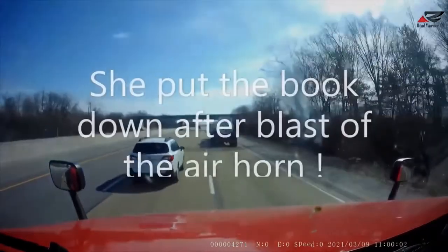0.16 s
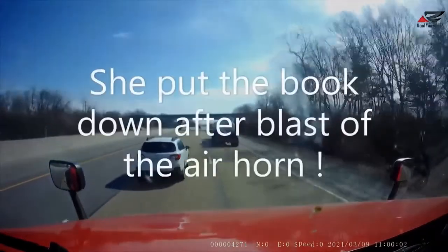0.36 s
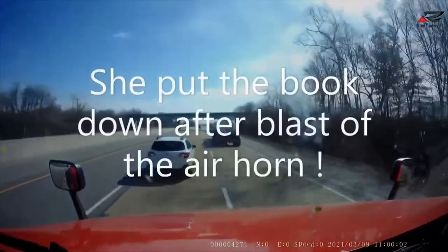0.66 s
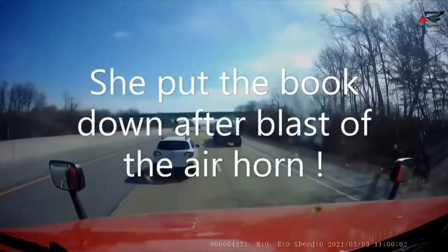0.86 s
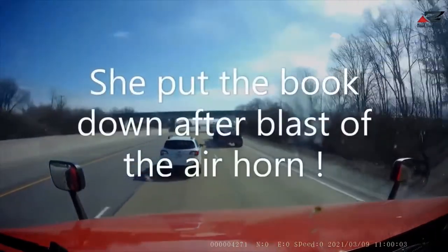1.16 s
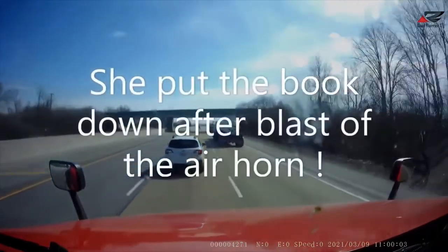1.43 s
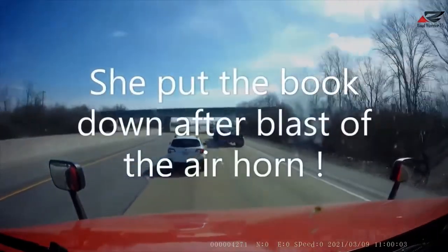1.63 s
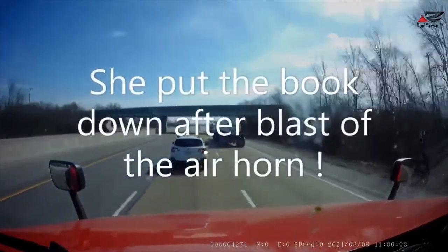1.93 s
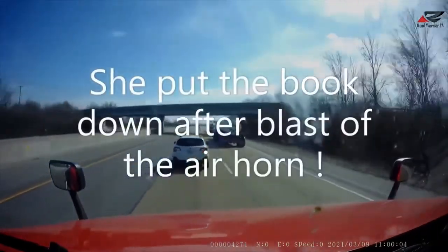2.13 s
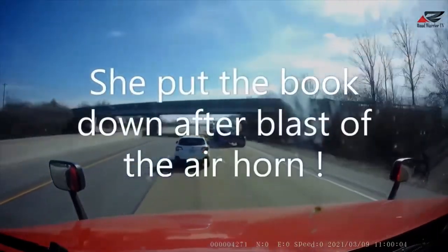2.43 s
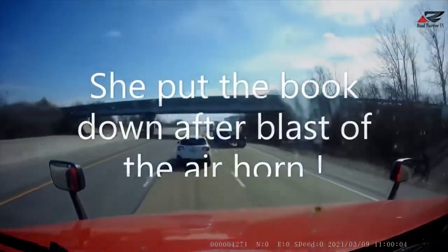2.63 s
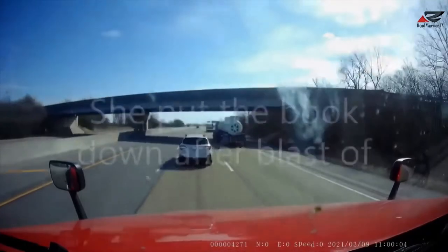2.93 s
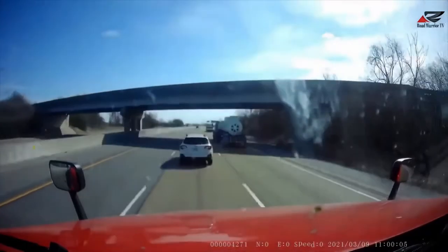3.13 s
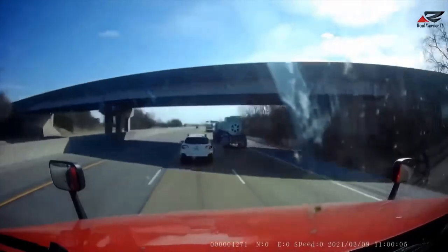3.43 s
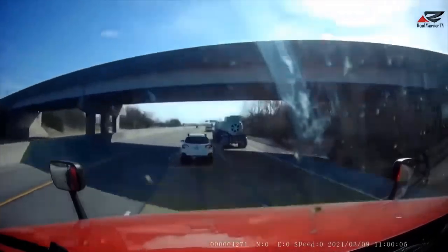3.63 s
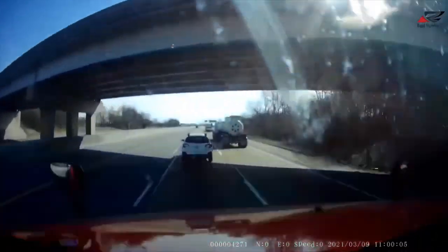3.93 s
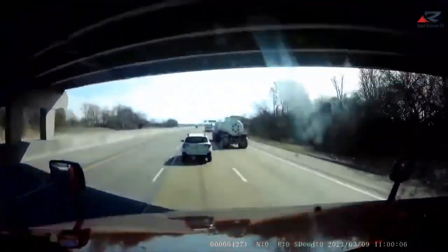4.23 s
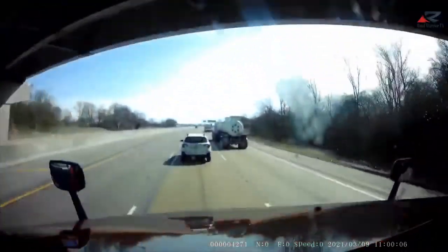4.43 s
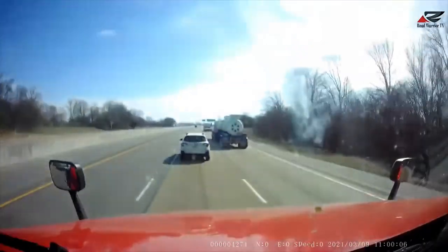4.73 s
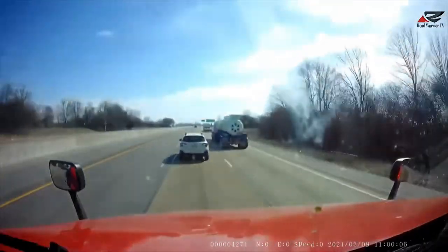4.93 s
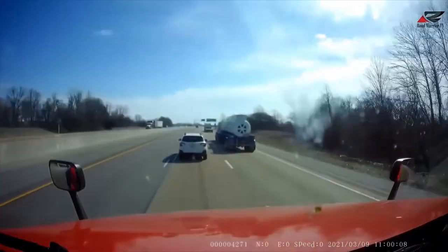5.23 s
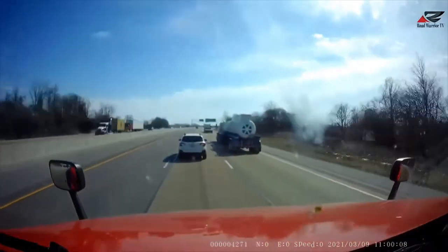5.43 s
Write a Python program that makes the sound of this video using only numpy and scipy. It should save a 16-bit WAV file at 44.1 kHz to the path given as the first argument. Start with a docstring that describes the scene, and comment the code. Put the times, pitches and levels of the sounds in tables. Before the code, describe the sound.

Inside a moving diesel truck cab, a low engine drone and dull tyre and wind roar run throughout, with a very faint clicking turn indicator. Just before one second an air valve pops, then the horn gives one loud, brassy, steady blast of nearly a second. It cuts off quickly, and the drone carries on alone until an abrupt ending. Close microphone behind the windscreen.

```python
"""Inside the cab of a diesel truck on a highway, heard from behind the windscreen.
From the start the six-cylinder engine drones, a sum of orders of its cycle rate, under tyre and wind noise;
the turn indicator ticks faintly as short high rings. Then the air valve pops open, the horn's bore rings
roughly, and the diaphragm gives one brassy blast of summed harmonics, turning dull and slightly sharp
as its air runs out. Drone, road and ticks go on until everything fades out."""
import sys
import numpy as np
from scipy import signal
from scipy.fft import rfft, irfft
from scipy.io import wavfile
from scipy.ndimage import uniform_filter1d

SR = 44100
rng = np.random.default_rng(int(sys.argv[2]) if len(sys.argv) > 2 else 0)


def output_pcm(signal):
    """Save a mono or channel-first signal as 16-bit PCM at the path in sys.argv[1].

    Samples are clipped to [-1, 1] before scaling.
    """
    pcm = np.clip(np.atleast_2d(signal).T, -1, 1) * 32767
    wavfile.write(sys.argv[1], SR, np.round(pcm).astype(np.int16))


N = 246033

CYLINDERS = 6
# the horn's settled note, before its small random wander
HORN_HZ = 277.87
# air pressure in the horn is full from FULL_S until the valve shuts at SHUT_S
FULL_S, SHUT_S = 0.934, 1.701


def horn():
    """The diaphragm chops the air into sharp pulses; at low pressure it grazes its seat, then swings almost as a sine."""
    # horn at full pressure: (harmonic, relative level/dB)
    partials = [(1, 7), (2, -1.5), (3, 4.5), (4, 1), (5, -17), (6, -3), (7, -11), (8, -1.5), (9, -14.5),
                (10, -22.5), (11, -23), (12, -33.5), (13, -26), (14, -31.5), (15, -39.5), (16, -35.5),
                (17, -49), (18, -42), (19, -49), (20, -40), (21, -45.5), (22, -36), (23, -41.5),
                (24, -61.5), (25, -63), (26, -67.5), (27, -69.5), (28, -63), (29, -59.5), (30, -57.5),
                (31, -69), (32, -58), (33, -69)]
    # highest strong overtone: swinging freely, and what touching the seat adds
    free_hz, touch_hz = 460, 740
    # extra brassiness of the top overtones: held, added by the first surge of air, and that surge's length
    held_brass_db, surge_db, surge_s = 2.2, 4, .16
    # overtones from here upward come in late, the higher the later
    late_from_hz, lag_s_per_hz = 2800, 6.5e-6
    # overtones left while only grazing: level, and their fall per harmonic above the corner harmonic
    graze_db, graze_fall_db, graze_corner = -17, 4, 7.5

    hz, size = blast_controls()
    phase = 2 * np.pi * np.cumsum(hz * (1 + .0008 * walk(60))) / SR
    # the diaphragm swings wide enough to touch its seat
    touch = gate(start=.907, attack=.02, end=1.765, release=0.022)
    edge_hz = free_hz + touch_hz * touch
    since_full = np.arange(N) / SR - FULL_S
    brass_db = held_brass_db + surge_db * np.exp(-(since_full / surge_s) ** 2)
    tone, power = 0, 0
    for k, partial_db in partials:
        k = round(k)
        swing = 1 / np.sqrt(1 + (k * HORN_HZ / edge_hz) ** 16)
        # striking and grazing make pulses of different shape, so the overtones dip between the two
        strike = pressure(lag_s_per_hz * max(k * HORN_HZ - late_from_hz, 0))
        graze_gain = undb(graze_db - graze_fall_db * max(k - graze_corner, 0))
        graze = touch * (1 - strike) * (1 - swing) * graze_gain
        # the overtones flutter and rasp, the high ones most
        slow_flutter_db = min(.4 + .12 * k, 1.8) * walk(16)
        rasp_db = .06 * k * walk(110)
        flutter = undb(slow_flutter_db + rasp_db)
        # the flare delays each overtone differently, which smears the pulse
        smear = .13 * k ** 2 + .35 * rng.standard_normal()
        # at full pressure the wave steepens in the bore and the top turns brassy
        brass = undb(brass_db * strike * np.clip((k - 8) / 4, 0, 1))
        full = undb(partial_db) * (swing + (1 - swing) * strike) * brass
        struck_wave = full * np.cos(k * phase - smear)
        grazed_wave = graze * np.cos(k * phase - smear + 2.2)
        tone = tone + flutter * (struck_wave + grazed_wave)
        power += undb(partial_db) ** 2 / 2
    # air hisses through the gap once a cycle
    hiss = noise([(200, -17.5), (900, 0.0), (1400, -6), (2200, -14.5), (2700, -16.0),
                  (3700, -18.5), (4700, -29.5), (9000, -42.5), (15000, -49.0)])
    hiss *= (1 + 0.49 * np.cos(phase)) * pressure()
    blast = size * (undb(-2.0) * tone / np.sqrt(power) + undb(-25.0) * hiss)
    return cab(blast, wet_db=-25, t60=.3)


def blast_controls():
    """One pull of the cord: pitch and amplitude as the air fills the horn, holds and drains; slack air goes sharp."""
    # level of the held note: (t/s, level/dB)
    hold_levels = [(0.96, -11.5), (1.158, -13), (1.182, -12), (1.666, -12), (1.7, -12)]
    swing_start_s = .9
    # how sharp slack air is, and how long the note takes to settle and to rise again
    sharp_hz, settle_s, rise_s = 4.0, 0.022, 0.033
    t = np.arange(N) / SR
    settling = np.exp(-np.maximum(t - swing_start_s, 0) / settle_s)
    drained = np.maximum(t - SHUT_S, 0)
    rising = 1 - np.exp(-(drained / rise_s) ** 2)
    hold_db, = curves(hold_levels)
    swing = gate(swing_start_s, attack=0.06, end=1.868, release=0.14)
    return HORN_HZ + sharp_hz * (settling + rising), undb(hold_db) * np.sin(np.pi / 2 * swing)


def pressure(lag=0):
    """Air pressure in the horn, 0-1: it fills (late by lag seconds), holds and drains."""
    fill_s, drain_s = .011, 0.022  # time constants
    t = np.arange(N) / SR
    filling = (np.minimum(t - FULL_S - lag, 0) / fill_s) ** 2
    draining = (np.maximum(t - SHUT_S, 0) / drain_s) ** 2
    return np.exp(-filling - draining)


def valve_pop():
    """The valve cracks open, the air slaps the diaphragm, and the horn rings for a few cycles."""
    # slaps of the first air on the diaphragm: (t/s, relative ring level/dB, relative crack level/dB)
    slaps = [(0.862, -22.5, -13.5), (.8643, -0.5, -22), (.8679, 1.5, -28)]
    # what the horn rings with when slapped: (f/Hz, relative level/dB, t60/s)
    bell_rings = [(548, -19.5, 0.012), (735, 1, 0.041), (845, 1.5, 0.014), (1100, -17.5, 0.02),
                  (1730, -21.5, .015), (2145, -19, 0.031), (2714, -25, 0.033)]
    crack_t60_s = .02
    t = np.arange(N) / SR
    crack = noise([(200, -26), (500, -14), (850, 2), (1300, -5), (2000, 0), (2350, -8),
                   (2800, -2), (3300, -19), (4300, -23), (5000, -38), (14000, -60)])
    out = 0
    for start, ring_db, crack_db in slaps:
        age = np.maximum(t - start, 0)
        ring = sum(undb(db - 60 * age / t60) * np.sin(2 * np.pi * hz * age) for hz, db, t60 in bell_rings)
        onset = (1 - np.exp(-age / 0.00042)) ** 2
        dying_crack = undb(crack_db - 60 * age / crack_t60_s) * crack
        out = out + onset * (undb(ring_db) * ring + dying_crack)
    return undb(-7.0) * cab(out, wet_db=-6.5, t60=0.12)


def chuff():
    """Before the diaphragm locks to its note, and again as it lets go, rushing air roughly sounds the horn's bore."""
    # bore resonances: (loudest at t/s, swell time constant/s, f/Hz, level/dB)
    bore_rings = [(.914, .015, 736, -22.5), (.936, .015, 1130, -25), (1.782, .02, 848, -33)]
    t = np.arange(N) / SR

    def swell(at, length):
        """Bell-shaped rise and fall."""
        return np.exp(-((t - at) / length) ** 2)

    air = noise([(200, -13.0), (800, 6.0), (1600, 1), (2200, -7.5), (4000, -35.0), (7000, -44.0), (15000, -49.5)])
    bore = 0
    for at, length, hz, db in bore_rings:
        rough_gain = undb(db + 3.5 * walk(200))
        bore = bore + rough_gain * swell(at, length) * np.sin(2 * np.pi * hz * t + 0.28 * walk(190))
    return bore + undb(-26.5) * swell(.922, .014) * air


def engine(cycle):
    """Three exhaust thumps a cycle with firings between them; unequal cylinders fill the other orders."""
    # cab drone: (multiple of the four-stroke cycle rate, relative level/dB)
    drone_orders = [(3, -21), (4, -11), (6, -1.5), (8, -20), (9, -6), (10, -9), (11, -5.5), (12, 2),
                    (15, -16.5), (18, -14), (21, -34), (24, -24.5), (25, -13)]
    # drone as the load changes: (t/s, relative level/dB)
    load_levels = [(0, -2.5), (.45, -0.4), (.7, .3), (2.0, -0.6), (3.1, -0.1), (4.2, -0.6), (5.0, -1.3)]
    load_db, = curves(load_levels)
    out = 0
    for order, db in drone_orders:
        order = round(order)
        # the thump orders nearly line up, the others start anywhere
        offset = rng.random() * (1 if order % (CYLINDERS // 2) else .2)
        wave = np.sin(2 * np.pi * (order * cycle + offset) + np.pi / 2)
        out = out + undb(db + .6 * walk(4)) * wave
    return level(out * undb(load_db), -25.0)


def speed_up():
    """Share of the way from the starting cycle rate to the cruising rate."""
    cruise_s = 3.9
    return np.minimum(np.arange(N) / SR / cruise_s, 1)


def road(cycle):
    """Tyre and wind roar, ruffled by turbulence and throbbing a little with the firings; its resonances come and go."""
    # tyres and wind through the cab walls: (f/Hz, relative level per Hz/dB)
    roar_colour = [(8, -8.5), (35, -3), (150, 2), (260, 0), (400, 1.65), (530, -5.5), (680, -1), (860, -2),
                   (1140, -4), (1270, -17.5), (2100, -20), (2500, -27), (4000, -33), (4600, -45.5),
                   (15000, -54)]
    # narrow resonances in that noise: (f/Hz, width/Hz, rms level before wander and roar curve/dB)
    whistles = [(738, 35, -43.5), (871.5, 22, -41), (2070, 130, -54), (3012, 80, -59.5), (3800, 110, -72),
                (6100, 220, -71)]
    # road over time: (t/s, relative level/dB)
    roar_levels = [(0, -0.6), (.7, -0.5), (2.0, -.1), (3.3, 0), (3.8, 0), (4.85, 0.35), (4.96, -0.5)]
    wander_db = 1.2
    firing_throb = 0.043 * np.cos(2 * np.pi * CYLINDERS * cycle)
    half_rate_throb = 0.06 * np.cos(np.pi * CYLINDERS * cycle)
    throb = 1 + firing_throb + half_rate_throb
    roar_db, = curves(roar_levels)
    roar = level(ruffle(noise(roar_colour), depth_db=1.34, rate=22) * throb, -26.0)
    rings = sum(undb(db + wander_db * walk(20)) * resonance(hz, width) for hz, width, db in whistles)
    return (roar + rings) * undb(roar_db)


def ruffle(x, depth_db, rate):
    """Turbulence: every octave of a noise flickers on its own, the high ones most."""
    f = np.arange(1, N // 2 + 2) * SR / N
    octave = np.clip(np.log2(f / 100), 0, 6)  # octaves above 100 Hz
    spectrum, out = rfft(x), 0
    for band in range(7):
        band_noise = irfft(spectrum * np.maximum(1 - abs(octave - band), 0), N)
        band_depth_db = depth_db * min(band + 2, 6) / 6
        out = out + band_noise * undb(band_depth_db * walk(rate))
    return out


def resonance(hz, width):
    """Noise ringing in one narrow resonance, rms 1."""
    f = np.arange(N // 2 + 1) * SR / N
    return level(irfft(rfft(rng.standard_normal(N)) / (1 + ((f - hz) / width) ** 2), N), 0)


def indicator():
    """The turn indicator ticks on and off; each tick is a brief, rough, high ring with a weaker tone an octave below."""
    # ticks of one flash: (t/s from its start, relative level/dB)
    ticks = [(0.2455, -43.5), (.2565, -40), (.5490, -46.5), (0.594, -45), (.5990, -42.5)]
    flash_s, tick_hz, scatter_db = .7492, 3897, 1.5
    t = np.arange(N) / SR
    scrape = .6 * walk(900)  # roughens the ring
    phase = 2 * np.pi * tick_hz * t + scrape
    ring = np.sin(phase) + undb(-1.0) * np.sin(phase / 2)
    out = 0
    for start, db in ticks:
        age = t % flash_s - start  # the ticks repeat once per flash
        out = out + undb(db) * np.exp(-((age - .004) / .0036) ** 2) * ring
    out = out * undb(scatter_db * walk(12))
    return undb(-0.5) * cab(out, wet_db=-2.5, t60=0.069)


def cab(x, wet_db, t60):
    """Direct sound plus the dense, short reflections of the cab."""
    t = np.arange(SR // 4) / SR
    decay = np.exp(-np.log(1000) * t / t60)
    tail = rng.standard_normal(len(t)) * decay * (t > .003)
    return x + undb(wet_db) * signal.fftconvolve(x, tail / np.linalg.norm(tail))[:N]


def gate(start, attack, end, release):
    """Straight rise from 0 to 1, hold, straight fall; all in seconds."""
    t = np.arange(N) / SR
    return np.clip(np.minimum((t - start) / attack, (end - t) / release), 0, 1)


def noise(points):
    """Noise coloured by points of (f/Hz, relative level/dB), rms 1."""
    f = np.arange(N // 2 + 1) * SR / N + 1
    hz, db = np.transpose(points)
    colour = undb(np.interp(np.log(f), np.log(hz), db))
    return level(irfft(rfft(rng.standard_normal(N)) * colour, N), 0)


def walk(rate):
    """Smooth random wander with spread near 1, from rate random steps a second."""
    k = max(int(SR / rate), 1)
    steps = np.repeat(rng.standard_normal(6000)[:N // k + 1], k)
    return 1.35 * uniform_filter1d(uniform_filter1d(steps, k), k)[:N]


def curves(table):
    """Each column of a time table, sample by sample."""
    s, *columns = np.transpose(table)
    return [np.interp(np.arange(N) / SR, s, c) for c in columns]


def level(x, db):
    """Scale to an rms level."""
    return x * undb(db) / np.sqrt(np.mean(x ** 2))


def undb(db):
    """Decibels to gain."""
    return 10 ** (np.asarray(db) / 20)


def scene():
    """All sources as heard behind the windscreen."""
    # the four-stroke cycle rate creeps up to cruising speed and stays there
    start_hz, cruise_hz = 11.66, 12.11
    cycle = np.cumsum(start_hz + (cruise_hz - start_hz) * speed_up()) / SR
    return (horn() + valve_pop() + chuff() + engine(cycle) + road(cycle) + indicator())[None]


def record(dry):
    """Overall gain, the closing fade and a steep treble limit."""
    # fade_s: time to fall 60 dB; the curve makes the fall start gently
    fade_start_s, fade_s, fade_curve = 4.985, 0.044, 1.36
    gain_db, top_hz = 1.5, 15600
    faded = np.clip((np.arange(N) / SR - fade_start_s) / fade_s, 0, 2)
    fade_db = gain_db - 60 * faded ** fade_curve
    treble_limit = signal.ellip(8, .2, 80, top_hz, fs=SR, output="sos")
    return signal.sosfilt(treble_limit, dry * undb(fade_db))


dry = scene()
out = record(dry)
output_pcm(out)
```